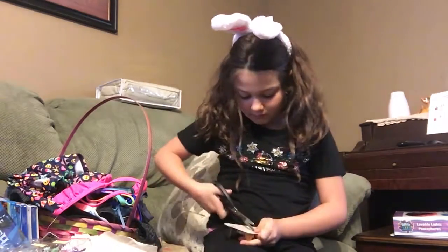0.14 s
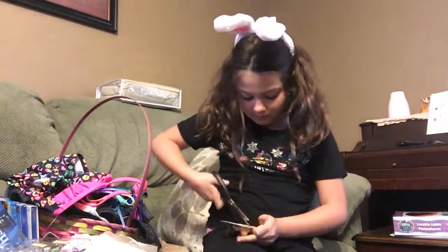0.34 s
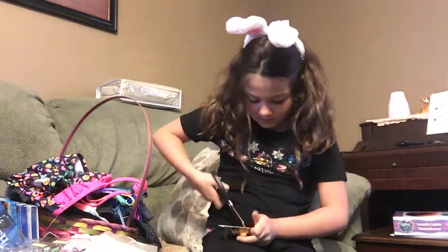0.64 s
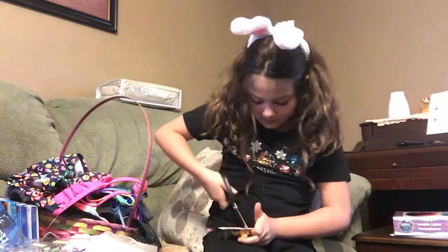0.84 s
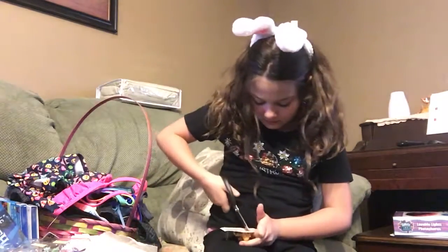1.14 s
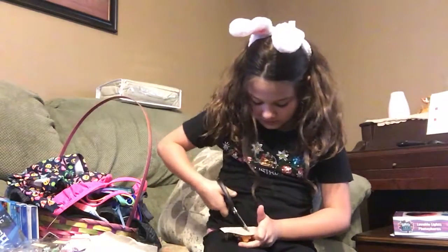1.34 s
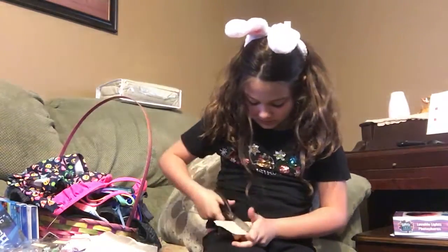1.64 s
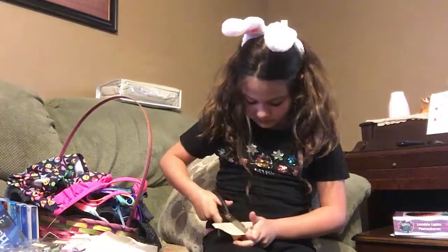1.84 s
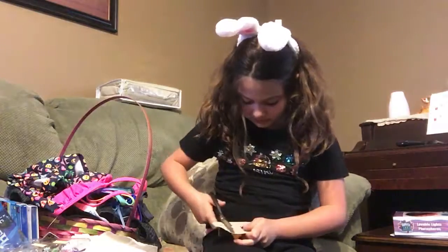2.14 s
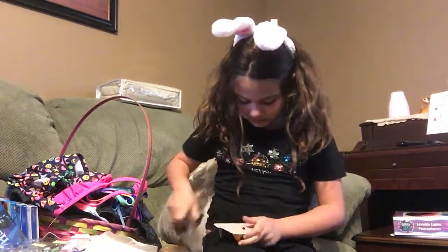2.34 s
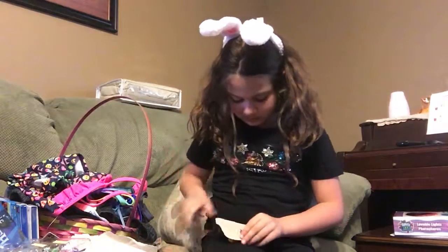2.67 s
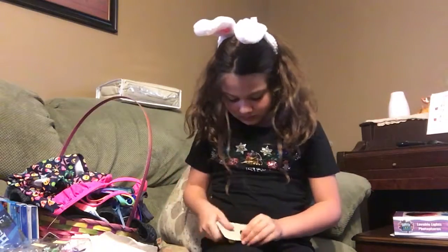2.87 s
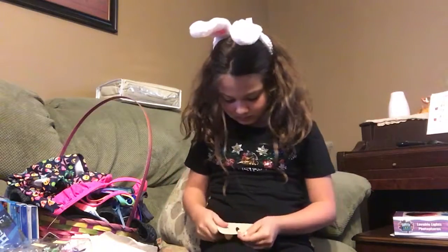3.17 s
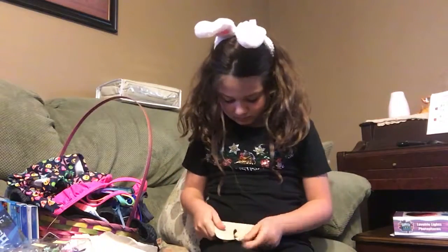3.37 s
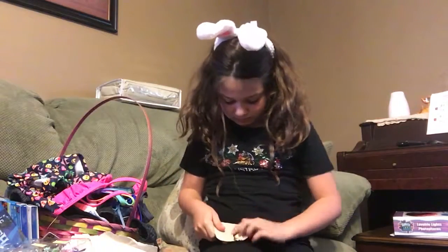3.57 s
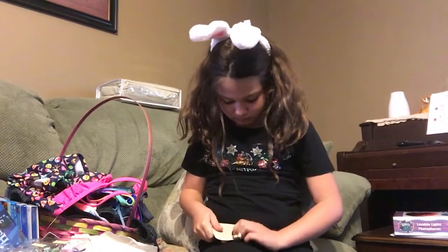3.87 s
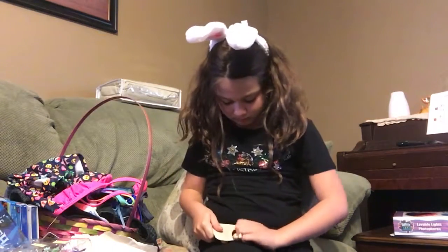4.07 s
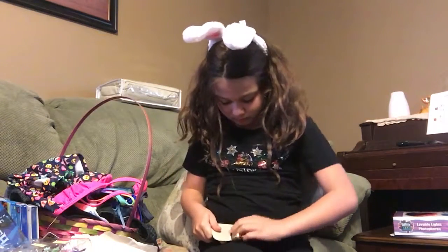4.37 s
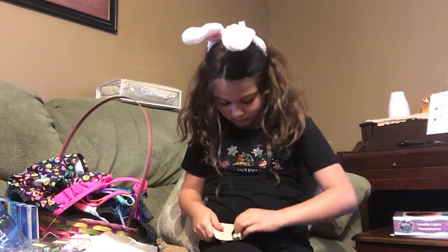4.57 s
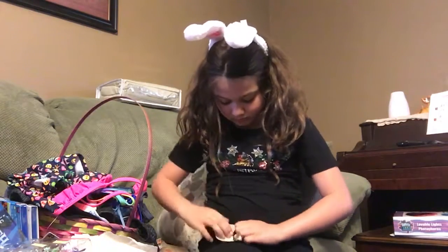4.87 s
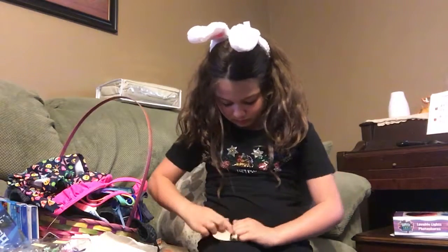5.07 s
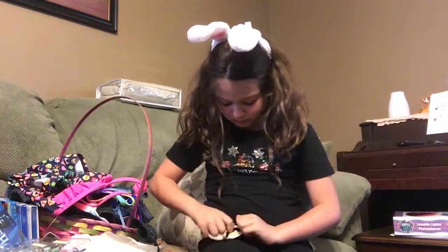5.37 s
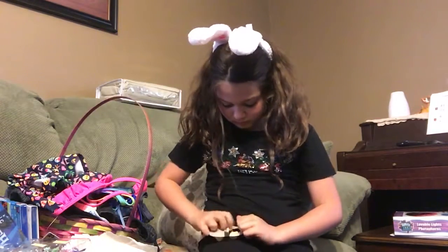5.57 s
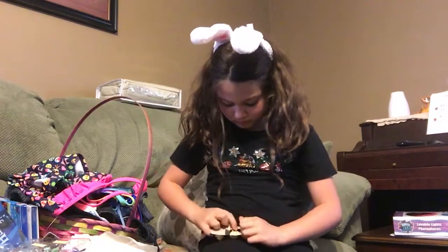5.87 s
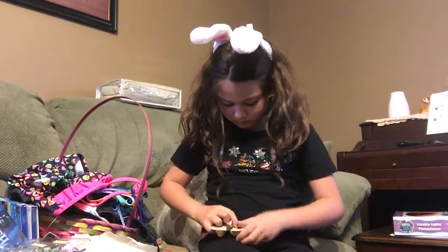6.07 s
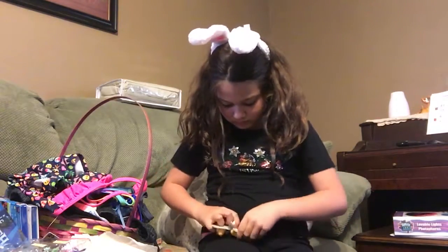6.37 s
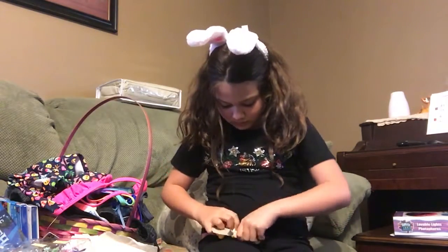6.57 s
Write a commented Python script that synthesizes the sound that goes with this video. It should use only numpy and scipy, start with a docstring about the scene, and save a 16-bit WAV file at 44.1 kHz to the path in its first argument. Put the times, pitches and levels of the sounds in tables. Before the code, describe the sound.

In a quiet living room, nearby scissors make a few short, crisp cuts through plastic, then land and rock on a hollow box with a dull boom. Soft, scattered crinkles and sharp snaps follow as the stiff package is pried open, mixed with light clicks of small toy pieces and dull bumps of hands on a lap. A faint hiss and hum lie underneath.

```python
"""A living room, where scissors snip a small plastic package and are dropped on a hollow box, whose
modes boom and wobble. Fingers then work the package open: the plastic crinkles by stick-slip friction,
the stiff shell snaps as it buckles, and little toy pieces click together inside it.
Near walls reflect every click, over a soft hiss and a mains hum."""
import sys
import numpy as np
from scipy import signal
from scipy.fft import rfft, irfft, next_fast_len
from scipy.io import wavfile
from scipy.ndimage import uniform_filter1d, map_coordinates

SR = 44100
rng = np.random.default_rng(int(sys.argv[2]) if len(sys.argv) > 2 else 0)


def wav_out(sig):
    """Save sig, one row per channel (or a flat mono array), as 16-bit PCM at SR to the path in sys.argv[1]."""
    wavfile.write(sys.argv[1], SR, np.round(np.clip(np.atleast_2d(sig).T, -1, 1) * 32767).astype(np.int16))


N = 296352


def amp(db):
    """Decibels to amplitude ratio."""
    return 10 ** (np.asarray(db) / 20)


def unit(x):
    """Normalisation to rms 1."""
    return x / np.sqrt(np.mean(x ** 2) + 1e-20)


def along(points, hz):
    """Interpolation of (frequency, value) points on a log-frequency axis."""
    f, v = np.transpose(points)
    return np.interp(np.log(hz + 1), np.log(f), v)


def above(hz, edge_hz, order=4):
    """High-pass characteristic: a smooth step from 0 to 1 around the edge."""
    return 1 - 1 / (1 + (hz / edge_hz) ** order)


def resonance(hz, ring_hz, octaves):
    """Resonance peak: a bell of height 1 on a log-frequency axis."""
    return np.exp(-.5 * (np.log2((hz + 1) / ring_hz) / octaves) ** 2)


def fade(t, t60):
    """Exponential decay by 60 dB in t60 seconds."""
    return np.exp(-np.log(1000) * t / t60)


def add(track, start_s, sound):
    """Superposition of a sound on the track."""
    start = round(start_s * SR)
    sound = sound[max(0, -start):]
    part = track[max(0, start):][:len(sound)]
    part += sound[:len(part)]


def coloured(x, gain_db, size=2048):
    """Minimum-phase filtering with the magnitude response gain_db(hz)."""
    cepstrum = irfft(np.log(amp(gain_db(np.fft.rfftfreq(size, 1 / SR))) + 1e-6))
    cepstrum[1:size // 2] *= 2
    cepstrum[size // 2 + 1:] = 0
    return signal.fftconvolve(x, irfft(np.exp(rfft(cepstrum))))


# Reverberation time: frequency_hz, t60_s
ROOM_DECAY = [(100, 0.52), (1000, 0.34), (2500, 0.27), (6000, 0.21), (15000, 0.2)]
# Near-wall reflections: delay_s, relative_db
REFLECTIONS = [(.0095, -14.5), (0.017, -19), (0.0174, -13.5), (0.025, -28.5)]
def in_room(x, wet_db, walls_db, scatter_t60=0.014, upholstery_db=-4):
    """Reverberation: direct sound, scattered reflections and a diffuse tail, new for each position."""
    hz, t, spectra = signal.stft(rng.standard_normal(SR // 4), SR, nperseg=256)
    tail = signal.istft(spectra * fade(t, along(ROOM_DECAY, hz)[:, None]), SR, nperseg=256)[1]
    response = np.zeros(SR // 4)
    add(response, .009, amp(wet_db) * tail / np.linalg.norm(tail))
    brief = np.arange(SR // 100) / SR
    early = np.zeros(SR // 20)
    for delay_s, db in REFLECTIONS:
        scatter = rng.standard_normal(len(brief)) * fade(brief, scatter_t60)
        add(early, delay_s, amp(db + walls_db) * scatter / np.linalg.norm(scatter))
    # soft furniture absorbs treble
    add(response, 0, coloured(early, lambda f: upholstery_db * above(f, 2400), size=256))
    response[0] = 1  # direct sound
    return signal.fftconvolve(x, response)


# Background noise spectrum: frequency_hz, relative_db
AIR_SPECTRUM = [(20, -26.5), (45, 4), (125, -2.5), (168, -10.5), (230, -6), (480, -14), (800, -16.5),
                (1800, -20), (3300, -16.5), (4100, -21), (4950, -25), (5700, -20), (7000, -24),
                (8000, -27.5), (13500, -32), (16000, -38)]
# Appliance hum: pitch_hz, level_db
HUM_PARTIALS = [(64.6, -69.5), (119.6, -63), (209.9, -78.5), (296.1, -78.5)]
def room_tone(air_db=-60, drift_rad=0.56):
    """Broadband hiss and rumble, with a hum made slightly unsteady by phase modulation."""
    t = np.arange(N) / SR
    air = coloured(rng.standard_normal(N + SR), lambda hz: along(AIR_SPECTRUM, hz), size=8192)
    hum = np.zeros(N)
    for hz, db in HUM_PARTIALS:
        wander = map_coordinates(rng.standard_normal(40), [t * 4])
        hum += amp(db) * np.sqrt(2) * np.sin(2 * np.pi * hz * t + drift_rad * wander)
    return amp(air_db) * unit(air[SR:SR + N]) + hum


# Response of the plastic sheet: frequency_hz, relative_db
SHEET_SPECTRUM = [(100, -39), (400, -10.5), (780, -12), (1080, 0.5), (1400, -2), (2600, 2.5), (3600, -5),
                  (4400, -6), (4950, -13.5), (5800, -10.5), (6900, -11.5), (7900, -17), (13000, -21),
                  (16000, -27)]
# Envelope of the fingers shifting their hold: time_s, level_db
GRIP_LEVELS = [(0, -75), (1.0, -69), (2.0, -81), (2.6, -60), (3.2, -69.5), (4.1, -70), (4.6, -62.5),
               (5.05, -57), (5.3, -54.5), (5.449, -67), (5.8, -64.5), (6.05, -70.5), (6.72, -60.5)]
def grip(ticks_per_s=300, spread_db=4, hiss=0.59, fidget_per_s=14, fidget_db=1.4, treble_db=3.5):
    """Friction: tiny ticks and the hiss of skin excite the sheet while the package is held."""
    t = np.arange(N) / SR
    chance = rng.random(N)
    size, friction = rng.standard_normal((2, N))
    fidget = map_coordinates(rng.standard_normal(400), [t * fidget_per_s], mode="mirror")
    ticks = (chance < ticks_per_s / SR) * amp(spread_db * np.clip(size, -2, 2))
    force = (unit(ticks) + hiss * friction) * amp(fidget_db * fidget)
    sound = coloured(force, lambda hz: along(SHEET_SPECTRUM, hz) + treble_db * above(hz, 3500))
    envelope = amp(np.interp(t, *np.transpose(GRIP_LEVELS)))
    return envelope * unit(in_room(sound, wet_db=-10, walls_db=0.5)[:N])


# Response of stiff plastic: frequency_hz, relative_db
SHELL_SPECTRUM = [(100, -33), (300, -18.5), (480, -3.5), (720, -14.5), (1050, 0.5), (1800, 5.5), (2900, 5),
                  (3700, -1), (4900, -9.5), (6200, -9.5), (7900, -21), (9500, -19), (15500, -29)]
def clicks(events, ring_db, ring_octaves, upper_db, chatter, wet_db, walls_db,
           upper_hz=6200, chatter_t60=0.028, crush_size=0.23):
    """Impulse excitation: a brief crush, one sharp push and a short chatter ring a stiff body."""
    lead_s = .01  # the crush begins before the push
    track, t = np.zeros(N), np.arange(SR // 25) / SR - lead_s
    for start_s, db, ring_hz, treble_db, hollow_db, crush_s in events:
        crush = crush_size * np.exp(-abs(t) / crush_s)
        rattle = chatter * fade(abs(t), chatter_t60) * (t > 0)
        push = (crush + rattle) * rng.standard_normal(len(t))
        push[round(lead_s * SR)] = 1
        force = rfft(push)
        power = abs(uniform_filter1d(abs(force) ** 2, size=41))
        flat_push = irfft(force / np.sqrt(power + 1e-9))  # broadband: the body gives the colour
        tilt = lambda hz: treble_db * above(hz, 4100) + hollow_db * (1 - above(hz, 1710))
        ring = lambda hz: ring_db * resonance(hz, ring_hz, ring_octaves)
        upper = lambda hz: upper_db * resonance(hz, upper_hz, ring_octaves)
        click = coloured(flat_push, lambda f: along(SHELL_SPECTRUM, f) + ring(f) + upper(f) + tilt(f))
        add(track, start_s - lead_s, in_room(amp(db) * unit(click), wet_db, walls_db))
    return track


# Scissors gripped, shut and set down: start_s, level_db, pitch_hz, treble_db
SCISSOR_CLACKS = [(0.0048, -40, 1570, -1), (0.0144, -40, 980, 2.5), (1.206, -65.5, 2720, -8),
                  (1.477, -64, 1060, 6), (1.5923, -48, 3130, -5), (1.852, -64, 2270, 6),
                  (1.963, -67.5, 2600, -1), (2.045, -53.5, 3030, 4.5), (2.444, -43.5, 1250, 10),
                  (2.4567, -48, 1200, -15), (2.5572, -48, 1940, -2), (2.6025, -55, 1300, 11),
                  (2.904, -57.5, 1110, 10)]
def scissors(crush_s=0.00044, hollow_below_hz=2950, hollow_db_per_octave=10.5):
    """Impact: handles and pivot knock, and the lower the resonance, the more hollow the sound."""
    events = [(s, db, hz, treble_db, hollow_db_per_octave * np.log2(hollow_below_hz / hz), crush_s)
              for s, db, hz, treble_db in SCISSOR_CLACKS]
    return clicks(events, ring_db=4.5, ring_octaves=0.092, upper_db=1.2, chatter=0.27,
                  wet_db=-11.5, walls_db=0.8)


def crackle(strokes, slips_per_s, uneven_db, ring_db, taper, wet_db, pops_per_s, pop_db, ring_hz=2050):
    """Stick-slip motion: clumps of fine fractures and a few popping creases excite the sheet."""
    track = np.zeros(N)
    sheet = lambda hz: along(SHEET_SPECTRUM, hz) + ring_db * resonance(hz, ring_hz, 0.84)
    for start_s, length_s, db, treble_db in strokes:
        n = int(length_s * SR)
        t = np.arange(n) / SR
        slips = map_coordinates(rng.standard_normal(200), [t * slips_per_s], mode="mirror")
        fractures = rng.standard_normal(SR // 2)
        pops = amp(pop_db) * (rng.random(SR // 2) < pops_per_s / SR)
        force = (fractures + pops)[:n] * amp(uneven_db * slips) * signal.windows.tukey(n, taper)
        sound = coloured(force, lambda hz: sheet(hz) + treble_db * above(hz, 3900))
        sound *= amp(db) * np.sqrt(n) / np.linalg.norm(sound)
        add(track, start_s, in_room(sound, wet_db, walls_db=-5))
    return track


# Strokes along the plastic: start_s, length_s, level_db, treble_db
RUB_STROKES = [(0.33, 0.16, -64.5, -2), (0.68, 0.033, -57.5, 1), (1.78, 0.065, -59.5, -1.5),
               (2.045, 0.17, -53.5, -3.5), (2.444, 0.076, -46.5, -0.5), (2.53, 0.17, -56, -8),
               (2.815, 0.038, -55, 6), (2.9, 0.06, -49.5, -1), (3.08, 0.022, -59.5, -7),
               (3.37, 0.06, -61.5, 0), (3.715, 0.034, -55.5, -2), (4.042, 0.011, -38.5, 3),
               (4.245, 0.051, -54.5, -2.5), (4.695, 0.092, -53.5, -2.5), (4.85, 0.08, -50.5, -1.5),
               (4.975, .047, -58, 8), (5.08, .064, -48, -7), (5.168, 0.0465, -46.5, -1.5),
               (5.595, 0.046, -46.5, -10), (6.235, 0.039, -59, -2), (6.465, 0.033, -56, -10)]
def rubs():
    """Sliding friction: the scissors slide, and plastic rubs, flexes and tears with sparse pops."""
    return crackle(RUB_STROKES, slips_per_s=253, uneven_db=2.5, ring_db=-1.5, taper=0.17,
                   wet_db=-5.5, pops_per_s=70, pop_db=22.5)


# Strokes of the blades: start_s, length_s, level_db, treble_db
CUT_STROKES = [(0.7375, .028, -44, 0.5), (1.284, 0.02, -44.5, -5.5), (1.592, 0.013, -33.5, -8.5),
               (1.624, 0.0135, -35.5, -6), (1.637, 0.032, -45, 1)]
def cuts():
    """Shear fracture: the blades part the plastic in rapid slips with dense, small pops."""
    return crackle(CUT_STROKES, slips_per_s=540, uneven_db=2.3, ring_db=-3.0, taper=0.083,
                   wet_db=-7.5, pops_per_s=250, pop_db=15.5)


# Facets giving way: start_s, level_db, pitch_hz, treble_db, hollow_db, crush_s
SHELL_SNAPS = [(0.779, -35.5, 3130, 9, 1, 0.00041), (1.2939, -49, 2480, 3, -16, 0.0016),
               (1.603, -41, 2160, -3, 0, 0.0035), (1.6067, -44.5, 1070, 15, 13, 0.0007),
               (1.618, -44, 2470, -2, -8, 0.0022), (3.9274, -39, 2400, -9, -4.5, 0.00053),
               (4.0478, -50, 3240, 10, 11, 0.0084), (4.7112, -51, 1400, 7.5, 6, .0005),
               (4.9365, -52.5, 1710, 17.5, 9.5, .002), (5.1119, -41.5, 2640, 10, 3.5, 0.0015),
               (5.3143, -40, 2020, 5, 0.5, 0.0013), (5.48, -45.5, 1496, 7, 5.5, 0.0022),
               (5.49, -42, 1670, 11.5, 7, .0018), (5.5217, -30, 2760, 0.5, -18.5, .0003),
               (5.6273, -48.5, 1100, -21, 7, 0.0012), (5.6777, -56, 2570, 0, -6, .0004),
               (6.2532, -58, 1170, -1, 0, 0.00056)]
def shell():
    """Buckling: the package snaps one facet at a time, each with its own resonance."""
    return clicks(SHELL_SNAPS, ring_db=5, ring_octaves=0.21, upper_db=2, chatter=0.079,
                  wet_db=-11.5, walls_db=0.5)


# Scissors striking the box: start_s, relative_db
BOX_JOLTS = [(2.444, -32.5), (2.477, -34), (2.51, -46), (2.558, -42.5), (2.635, -40), (2.753, -47.5),
             (2.84, -48)]
# Modes of the box: pitch_hz, bandwidth_hz, relative_db
BOX_MODES = [(71.6, 13, -3), (114.5, 13, -1), (140.4, 5.7, -1), (195, 18, -1), (274, 81, -11),
             (355, 29, -4.5), (464, 38, -16.5), (581, 37, -13), (623, 9.7, -4.5), (698, 48, -10),
             (790, 13, -13.5), (1360, 810, -17)]
def box(gain_db=-2, rattle_t60=0.45, attack_s=0.0013):
    """Forced vibration: the scissors land and rock, and each dying rattle drives the box's modes."""
    force, t = np.zeros(N), np.arange(SR // 2) / SR
    envelope = fade(t, rattle_t60) * (1 - np.exp(-t / attack_s))
    for start_s, db in BOX_JOLTS:
        add(force, start_s, amp(db + gain_db) * rng.standard_normal(len(t)) * envelope)
    f = np.fft.rfftfreq(N, 1 / SR)
    modes = sum((-1) ** k * amp(db) * 1j * f * width / (hz * hz - f * f + 1j * f * width)
                for k, (hz, width, db) in enumerate(BOX_MODES))
    response = modes * (1 - above(f, 3800))
    return irfft(rfft(force) * response / np.sqrt(np.mean(abs(response) ** 2)), N)


# Spectrum of a dull bump: frequency_hz, relative_db
BUMP_SPECTRUM = [(20, -15), (45, -9), (90, -6.5), (170, -19), (400, -45), (1500, -77)]
# Bumps of hands and knees: peak_s, level_db
LAP_BUMPS = [(3.4, -54), (3.8, -53), (3.852, -51), (4.001, -52), (5.218, -54), (5.619, -49), (5.76, -55),
             (5.853, -53.5)]
def bumps(rise_s=0.0156):
    """Soft impact: hands moving on the lap excite mainly low frequencies."""
    track, t = np.zeros(N), np.arange(SR // 4) / SR
    envelope = t / rise_s * np.exp(1 - t / rise_s)
    for peak_s, db in LAP_BUMPS:
        thud = coloured(rng.standard_normal(len(t)), lambda hz: along(BUMP_SPECTRUM, hz), size=8192)
        add(track, peak_s - rise_s, amp(db) * unit(thud[:len(t)]) * envelope)
    return track


# Toy pieces colliding: start_s, level_db, treble_db, crush_s
PIECE_CLICKS = [(3.6052, -57.5, 11, 0.00051), (3.616, -50, 3, 0.0024), (4.302, -60, 11, 0.0015),
                (4.3648, -57, 14, 0.0011), (4.6555, -55, 9, 0.00042), (4.7038, -54, 10, .0008),
                (4.9, -58.5, 22, 0.00026), (5.9262, -49, 22, 0.002), (6.138, -57, -7, .0008),
                (6.1709, -61, 12, .0004), (6.4694, -53.5, 7, 0.00045), (6.5698, -60.5, 14, 0.00022)]
def pieces(ring_hz=3230, body_db=3, hollow_share=0.46):
    """Free vibration: hard pieces share one high ring; harsher contact adds both lows and treble."""
    events = [(s, db, ring_hz, treble_db, body_db + hollow_share * treble_db, crush_s)
              for s, db, treble_db, crush_s in PIECE_CLICKS]
    return clicks(events, ring_db=10, ring_octaves=0.16, upper_db=1.5, chatter=0.21,
                  wet_db=-12.5, walls_db=1.0)


def scene():
    """Superposition: cutting, crinkling and clicking add to the quiet room in one channel."""
    handling = cuts() + rubs() + shell() + pieces() + scissors() + grip()
    return (handling + box() + bumps() + room_tone())[None]


def record(dry, cutoff_hz=15950):
    """Band limiting: an ideal low-pass filter removes everything above the cutoff."""
    size = next_fast_len(N + SR // 2)
    passband = np.fft.rfftfreq(size, 1 / SR) < cutoff_hz
    return irfft(rfft(dry, size) * passband, size)[..., :N]


dry = scene()
out = record(dry)
wav_out(out)
```